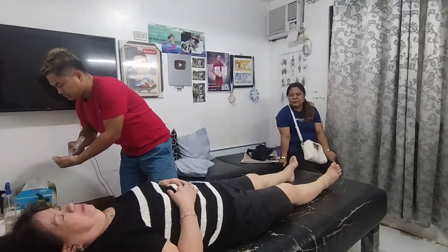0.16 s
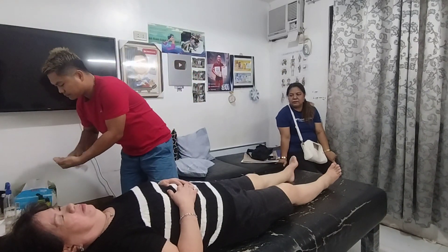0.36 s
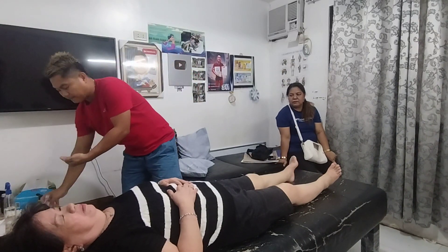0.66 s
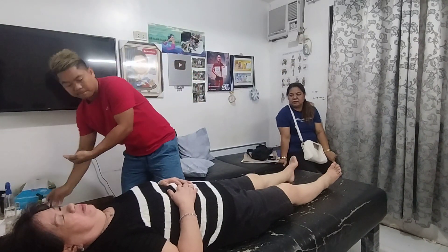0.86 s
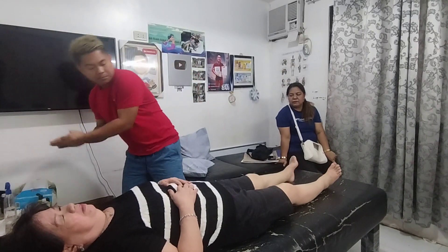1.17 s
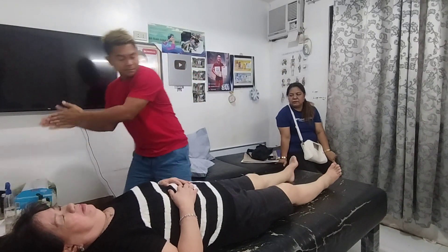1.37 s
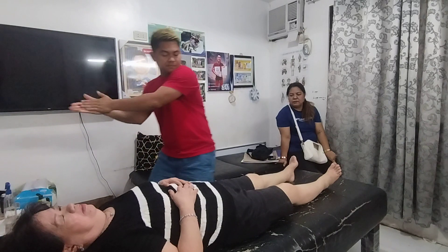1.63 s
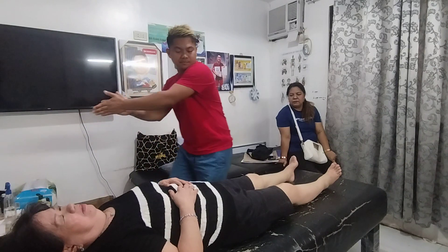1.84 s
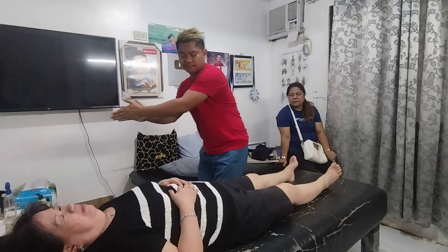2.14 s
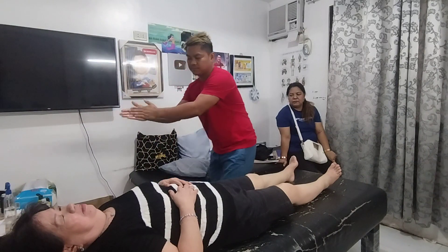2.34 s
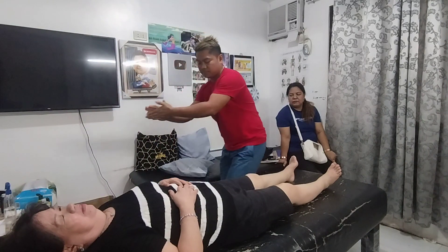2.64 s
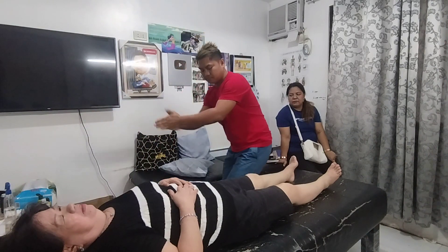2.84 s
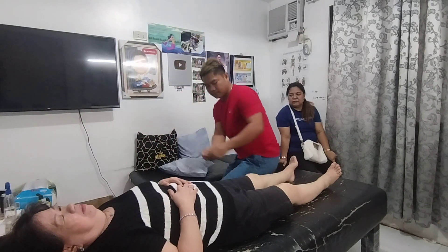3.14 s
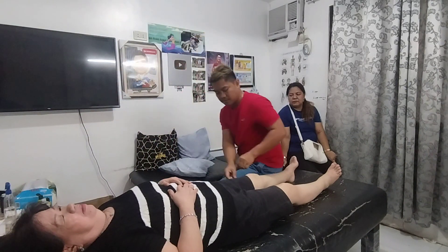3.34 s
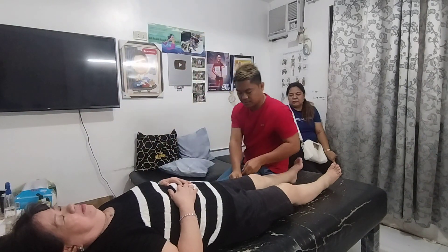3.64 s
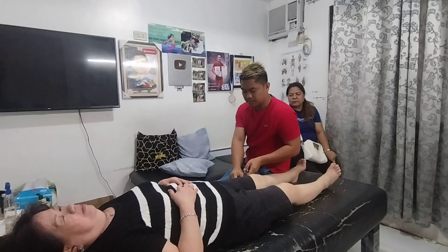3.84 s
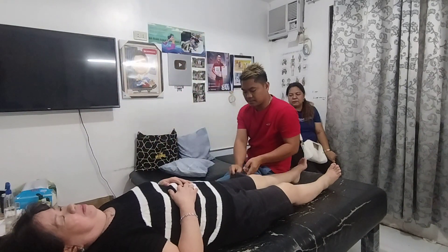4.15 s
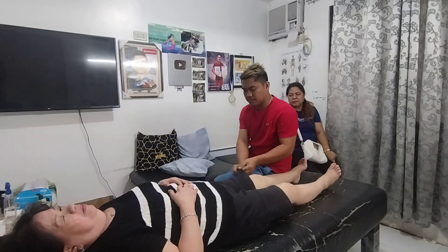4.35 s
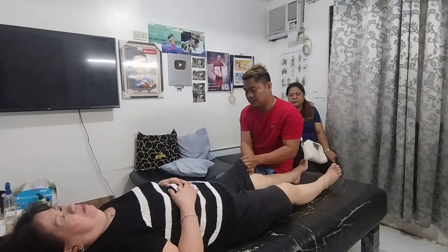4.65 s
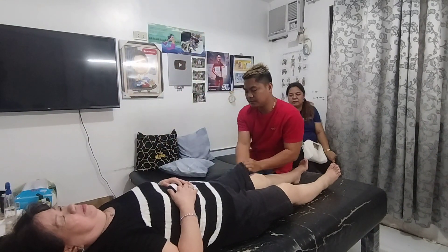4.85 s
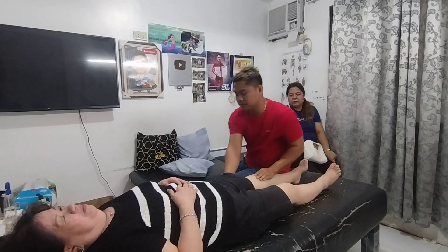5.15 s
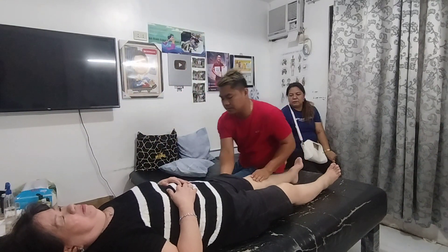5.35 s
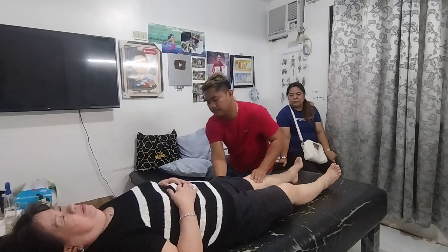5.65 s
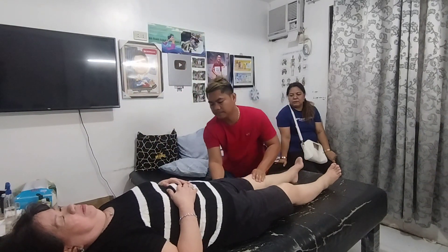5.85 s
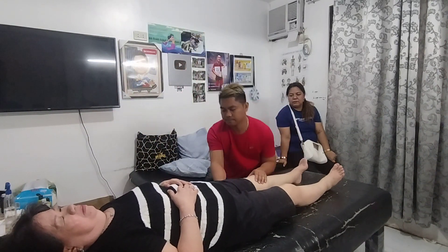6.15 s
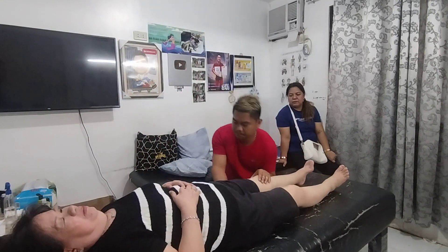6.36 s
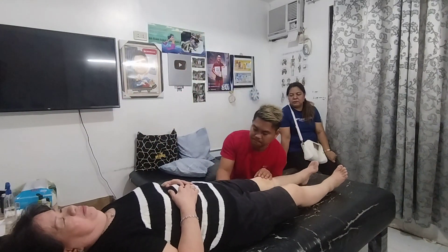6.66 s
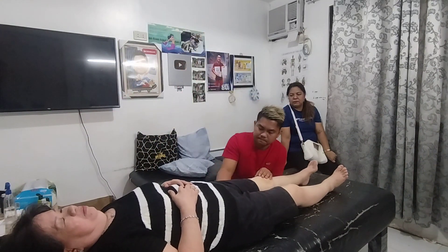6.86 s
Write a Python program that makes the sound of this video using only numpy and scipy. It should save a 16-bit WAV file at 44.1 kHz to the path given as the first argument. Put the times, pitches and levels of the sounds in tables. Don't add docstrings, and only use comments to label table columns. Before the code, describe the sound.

A window air conditioner hums low and steadily with rushing air in a small hard-walled room. A faint squeal passes outdoors at first, a bottle is set down with a soft knock, then oiled hands rub amid little clicks. Later clothes brush and a padded bench creaks, with the heaviest wooden thumps near the end. Stereo microphone a few steps away, short room echo.

```python
import sys
import numpy as np
from scipy import signal
from scipy.fft import rfft, irfft, next_fast_len
from scipy.io import wavfile
from scipy.ndimage import map_coordinates

SR = 44100
rng = np.random.default_rng(int(sys.argv[2]) if len(sys.argv) > 2 else 0)


def to_linear_factor(level_db):
    exponent = np.asarray(level_db, float) / 20
    return 10 ** exponent


def store_pcm(level_fs):
    pcm = np.round(np.clip(level_fs, -1, 1) * 32767).astype(np.int16)
    wavfile.write(sys.argv[1], SR, np.atleast_2d(pcm).T)


N = 309004

SHAFT_HZ, MAINS_HZ = 57.17, 60.0
# [shaft order, level/dB rms]
COMPRESSOR_ORDERS = [(1, -33), (2, -66.5), (3, -48), (4, -50.5), (5, -69), (6, -53), (7, -81), (8, -68.5),
                     (13, -73), (14, -71)]
# [mains multiple, level/dB rms]
MAINS_HUM = [(1, -59), (2, -55), (4, -61.5), (6, -58.5)]
# [f/Hz, level/dB rms]
FAN_LINES = [(22.9, -54), (72.7, -48), (234.2, -59), (418.6, -60.5), (540, -70), (932, -72)]
# [f/Hz, level/dB per Hz]
CASING_AIR = [(15, -101), (33, -73), (48, -60), (62, -58), (85, -64), (100, -74), (140, -61), (178, -63),
              (200, -77), (225, -71.5), (255, -68.5), (292, -66), (328, -78.5), (360, -70.5), (430, -72.5),
              (560, -81.5)]
# [f/Hz, level/dB per Hz]
GRILLE_HISS = [(260, -26), (450, 1.5), (499, -4), (682, -4), (791, -7.5), (1150, -21.5), (1850, -19),
               (2020, -18), (5970, -58.5), (7800, -22), (10800, -48), (15000, -69), (15700, -56)]
# [f/Hz, left-right likeness]
LIKENESS = [(60, 0.66), (130, 0.8), (290, 0.79), (640, 0.16), (1410, -0.18), (3100, 0.14), (6820, -0.086),
            (15000, 0.15)]
# [f/Hz, left minus right level/dB]
PORT_LEAN = [(60, .9), (150, 1.5), (300, .2), (1300, 0), (3000, -.8), (6500, -5), (10000, 0), (15000, 1)]
# [f/Hz, t60/s]
ROOM_DECAY = [(150, 0.44), (300, 0.33), (2000, 0.21), (8000, 0.36), (15000, 0.086)]

# [t/s, level/dB]
WHISTLE_LEVEL = [
    (4.12, -110),
    (4.18, -76),
    (4.45, -79),
    (4.64, -79),
    (4.7, -110),
]
# [t/s, level/dB]
SQUEAL_LEVEL = [
    (.15, -100),
    (.22, -76),
    (.4, -65),
    (.6, -67),
    (.76, -70),
    (.86, -100),
]
# [f/Hz, width/Hz, level/dB]
SQUEAL_MODES = [(1560, 50, 2), (3160, 90, -0.5), (4610, 100, -4)]

# [t/s, peak level/dB, centre f/Hz, width/Hz, left minus right level/dB]
SMALL_CLICKS = [(.22, -63, 10000, 4000, 0), (.36, -53, 9000, 5000, -2), (.414, -45.5, 7600, 1500, -6),
                (.8355, -42.5, 6850, 3000, -3), (.8355, -54, 12000, 6000, 0), (1.6996, -37, 9200, 7000, 1),
                (2.004, -37.5, 7700, 1800, -6), (2.0043, -41.5, 12500, 7000, 6),
                (2.005, -42, 2490, 2500, 1.5), (2.328, -44, 8800, 6000, 1), (2.9247, -43, 8350, 6000, -2),
                (3.2234, -35, 7570, 4000, -4), (3.2234, -51, 13000, 6000, 0), (5.165, -37, 4730, 4500, 0),
                (1.4535, -40, 3250, 600, 1), (1.4535, -44.5, 3720, 500, 1), (1.4535, -48.5, 2500, 600, 0)]
# [t/s, peak level/dB, centre f/Hz, width/Hz, left minus right
# level/dB]
DULL_TAPS = [(.215, -45, 900, 480, 1), (.838, -36, 2250, 1400, 0), (.843, -29.5, 550, 600, 0),
             (.838, -40, 950, 900, 0), (1.674, -39.5, 1730, 1600, 0), (1.705, -40, 2150, 1200, -1),
             (1.78, -39.5, 830, 1040, -1), (2.333, -41.5, 770, 840, 0), (2.928, -42.5, 1530, 300, -1),
             (3.223, -34, 3200, 1200, 0), (3.223, -35.5, 2050, 1100, 0), (3.226, -28, 1120, 1200, 0),
             (3.224, -34, 550, 370, 0.16), (3.61, -46.5, 1800, 2300, 0), (4.553, -38.5, 650, 500, 0),
             (4.52, -45, 1600, 1500, 0), (4.592, -40.5, 1600, 740, 0), (6.03, -37, 1000, 460, 0),
             (3.258, -38, 1260, 500, 0), (5.755, -36, 760, 1100, 0), (6.18, -31.5, 1000, 870, -1),
             (3.245, -43, 2600, 2100, 0), (1.02, -43, 3600, 1300, 0), (6.816, -35, 1170, 950, 1)]
# [t/s, peak level/dB, f/Hz, t60/s]
WOOD_BLOWS = [(.843, -24.5, 141.5, 0.28), (0.83, -31, 270, 0.11), (2.329, -32.5, 390, 0.13),
              (4.47, -36, 296, 0.33), (4.52, -36, 134, .15), (4.548, -29, 295, 0.4),
              (6.228, -22.5, 152, 0.31), (6.272, -26, 189, .2), (6.31, -19.5, 179, 0.37),
              (6.33, -24, 79, .3), (6.37, -22.5, 172, .3), (6.44, -31, 181, 0.14), (6.48, -33, 170, .2),
              (6.3, -40, 930, 0.27), (6.075, -33, 640, 0.16)]

# [f/Hz, width/Hz, level/dB]
BENCH_FRAME = [(83, 7.6, -5), (143, 27, -2), (177.4, 17.5, 1.5), (235.6, 11.6, -2)]
# [f/Hz, width/Hz, level/dB]
BENCH_BOARD = [(294.7, 13, -3), (394, 88, -8.5), (552, 126, -9.5), (622, 62, -7.5), (773, 130, -18.5),
               (935, 74, -17), (1300, 310, -24.5)]
# [t/s, reach/s, boom level/dB, creak level/dB]
BENCH_LEANS = [(.865, .05, -42, -53), (.955, .04, -46, -66), (2.34, 0.046, -58, -50), (4.46, .08, -42, -46),
               (4.56, .08, -39, -37), (5.48, 0.085, -63, -46), (5.62, .1, -54, -48.5),
               (5.73, 0.11, -55, -47), (5.97, .05, -38, -39), (6.09, 0.072, -37, -34),
               (6.19, 0.027, -44, -43), (6.27, 0.082, -27, -27.5), (6.37, .1, -30, -36.5)]

# [f/Hz, level/dB per Hz]
SKIN_COLOUR = [(1470, 0.5), (2500, -3), (3430, -2), (3560, -3), (5190, -8.5), (7800, -0.5), (8950, -6),
               (10000, -6), (11400, -12), (15700, -21)]
# [f/Hz, level/dB per Hz]
CLOTH_COLOUR = [(300, -38), (500, -3), (800, 2.5), (1500, 2), (2500, -2.5), (4000, -13), (7000, -21),
                (12000, -70)]
# [t/s of full pressure, reach/s, level/dB]
PALM_STROKES = [(.04, 0.17, -67), (1.04, 0.15, -55), (1.3, .15, -65.5), (1.55, 0.16, -61.5),
                (1.72, 0.12, -55), (1.98, 0.26, -63.5), (2.18, 0.1, -58.5), (2.35, 0.086, -56),
                (2.45, .06, -61), (2.56, 0.13, -56.5), (2.65, 0.079, -58), (2.75, .1, -57),
                (2.95, .15, -64), (3.27, 0.35, -61.5), (3.62, 0.13, -61.5), (3.84, 0.089, -44),
                (4.1, 0.25, -62), (4.54, 0.19, -61), (4.88, .2, -66), (5.09, 0.1, -55.5), (5.19, .07, -56),
                (5.37, .15, -66.5), (5.66, 0.23, -60), (5.91, 0.2, -51.5), (6.08, 0.15, -53),
                (6.31, 0.13, -52), (6.5, 0.16, -61), (6.78, 0.21, -56.5), (7.0, .1, -62)]
# [t/s of full pressure, reach/s, level/dB]
CLOTH_BRUSHES = [(.5, 0.22, -62), (1.75, 0.18, -58), (2.05, .15, -58), (2.35, .07, -53.5), (2.55, .1, -57),
                 (3.03, 0.21, -58), (3.33, .12, -58), (3.6, .12, -59.5), (3.84, 0.14, -55), (4.54, .1, -56),
                 (5.28, 0.062, -57.5), (5.53, 0.071, -56), (5.8, 0.43, -52), (6.08, 0.16, -48.5),
                 (6.3, .13, -44.5), (6.5, 0.22, -54.5), (6.68, .1, -58.5), (6.83, 0.086, -50.5),
                 (7.01, .05, -56)]
SKIN_REST_DB, CLOTH_REST_DB = -73, -58.5
SKIN_LOW_HZ = 1190
REACH_DB = 12


def unit(x):
    return x / np.sqrt(np.mean(x ** 2) + 1e-20)


def along(points, hz):
    f, v = np.transpose(points)
    return np.interp(np.log(hz + 1), np.log(f + 1), v)


def level_curve(rows):
    s, db = np.transpose(rows)
    return np.interp(np.arange(N) / SR, s, db, -140, -140)


def wobble(rate):
    at = np.arange(0, N + 64, 64)
    knots = rng.standard_normal(int(N * rate / SR) + 4)
    return np.interp(np.arange(N), at, map_coordinates(knots, [at * rate / SR]))


def swells(rows, point, linger, rest_db=-140):
    s, reach, *levels = np.transpose(rows)
    at = np.arange(0, N + 64, 64)
    away = (at[:, None] / SR - s) / reach
    fall_db = REACH_DB * np.where(away > 0, away / linger, -away * linger) ** point
    power = [to_linear_factor(2 * (db - fall_db)).sum(axis=1) + to_linear_factor(2 * rest_db) for db in levels]
    return [np.interp(np.arange(N), at, np.sqrt(p)) for p in power]


def filtered(x, response):
    m = next_fast_len(x.shape[-1] + 8192)
    spectrum = rfft(x, m) * response(np.fft.rfftfreq(m, 1 / SR))
    return irfft(spectrum, m)[..., :x.shape[-1]]


def modes(peaks):
    def response(f):
        total = 0
        for k, (centre, width, db) in enumerate(peaks):
            damping = 1j * f * width
            total = total + (-1) ** k * to_linear_factor(db) * damping / (centre * centre - f * f + damping)
        return total
    return response


def stereo(pair, colour=np.ones_like):
    def mid_side(hz):
        turn = np.arccos(np.clip(along(LIKENESS, hz), -1, 1)) / 2
        return colour(hz) * [np.cos(turn), np.sin(turn)]
    mid, side = filtered(pair, mid_side)
    return np.array([mid + side, mid - side])


def rush(colour, grain_db=0):
    grain = to_linear_factor(grain_db * wobble(250))
    return unit(stereo(rng.standard_normal((2, N)) * grain, colour))


def hum():
    lines = [(order * SHAFT_HZ, db) for order, db in COMPRESSOR_ORDERS]
    lines += [(multiple * MAINS_HZ, db) for multiple, db in MAINS_HUM] + FAN_LINES
    t = np.arange(N) / SR + 0.00015 * wobble(1.5)
    out = np.zeros((2, N))
    for hz, db in lines:
        phase = 2 * np.pi * (hz * t + rng.random())
        lag = hz / 1400
        unrest_db = min(0.0044 * hz, 1.2) + 1.6 * ((hz, db) in FAN_LINES[:2])
        level = to_linear_factor(db + 3 + unrest_db * wobble(2.496))
        out += level * np.sin([phase, phase - lag])
    return out


def air():
    low = rush(lambda hz: to_linear_factor(along(CASING_AIR + [(900, -120)], hz)))
    hiss = rush(lambda hz: to_linear_factor(along(GRILLE_HISS, hz)), grain_db=2.2)
    return to_linear_factor(-44.5 + 0.83 * wobble(3.02)) * low + to_linear_factor(-58.0 + 0.22 * wobble(4.2)) * hiss


def whistle():
    thin = to_linear_factor(level_curve(WHISTLE_LEVEL) + 3 * wobble(20)) * rush(modes([(14750, 60, 0)]))
    squeal = rush(lambda f: modes(SQUEAL_MODES)(f) ** 2)
    return thin + to_linear_factor(level_curve(SQUEAL_LEVEL) + wobble(13)) * squeal


def contacts(table, crack_s, room_db):
    out, t = np.zeros((2, N + SR)), np.arange(SR // 4) / SR
    for s, db, hz, width, pan_db in table:
        crack = rng.standard_normal(len(t)) * to_linear_factor(-60 * t / crack_s)
        bands, at, z = signal.stft(rng.standard_normal((2, len(t))), SR, nperseg=256)
        z = z * to_linear_factor(-60 * at / along(ROOM_DECAY, bands)[:, None])
        tail = stereo(signal.istft(z, SR, nperseg=256)[1][:, :len(t)])
        heard = crack + to_linear_factor(room_db) * tail * (1 - np.exp(-t / 0.0013))
        heard = filtered(heard, lambda f: modes([(hz, width, 0)])(f) ** 2)
        heard *= to_linear_factor(db + np.array([[pan_db / 2], [-pan_db / 2]])) / np.abs(heard).max()
        out[:, round(s * SR):][:, :len(t)] += heard
    return out[:, :N]


def thumps():
    out, t = np.zeros(N + SR), np.arange(SR // 2) / SR
    for s, db, hz, t60 in WOOD_BLOWS:
        envelope = to_linear_factor(db - 60 * t / t60) * (1 - np.exp(-t / 0.0027))
        out[round(s * SR):][:len(t)] += envelope * np.sin(2 * np.pi * hz * t)
    return out[:N]


def bench():
    rare = (rng.random((2, N)) < 0.012) * rng.standard_normal((2, N))
    slips = rare + 0.064 * rng.standard_normal((2, N))
    slips *= to_linear_factor([[0], [-6]])
    boom = unit(stereo(slips, lambda f: modes(BENCH_FRAME)(f) / (1 + (f / 300) ** 2)))
    creak = unit(stereo(slips[:, ::-1], lambda f: modes(BENCH_BOARD)(f) / (1 + (f / 1400) ** 2)))
    boom_gain, creak_gain = swells(BENCH_LEANS, point=1.36, linger=1.23)
    return to_linear_factor(0.46) * boom_gain * boom + to_linear_factor(-1.1) * creak_gain * creak


def rubbing():
    strokes, = swells(PALM_STROKES, point=1.16, linger=0.98, rest_db=SKIN_REST_DB)
    brushes, = swells(CLOTH_BRUSHES, point=1.6, linger=1.16, rest_db=CLOTH_REST_DB)
    flutter_db = 0.8 * wobble(30)

    def skin_colour(hz):
        return to_linear_factor(along(SKIN_COLOUR, hz)) * hz ** 2 / (hz ** 2 + SKIN_LOW_HZ ** 2)

    skin = rush(skin_colour, grain_db=0.5)
    cloth = rush(lambda hz: to_linear_factor(along(CLOTH_COLOUR, hz)), grain_db=0.5)
    return strokes * to_linear_factor(5.0 + flutter_db) * skin + brushes * to_linear_factor(2.0 + flutter_db) * cloth


def scene():
    clicks = contacts(SMALL_CLICKS, crack_s=0.058, room_db=-2.5)
    taps = contacts(DULL_TAPS, crack_s=0.04, room_db=0.0)
    return hum() + air() + whistle() + clicks + taps + thumps() + bench() + rubbing()


def band_limit(x):
    return signal.sosfilt(signal.butter(12, 15840, fs=SR, output="sos"), x)


def record(dry):
    def port_colour(hz):
        return to_linear_factor(along(PORT_LEAN, hz) * [[0.5], [-0.5]]) * (hz < 15750)

    return band_limit(filtered(dry, port_colour))


dry = scene()
out = record(dry)
store_pcm(out)
```